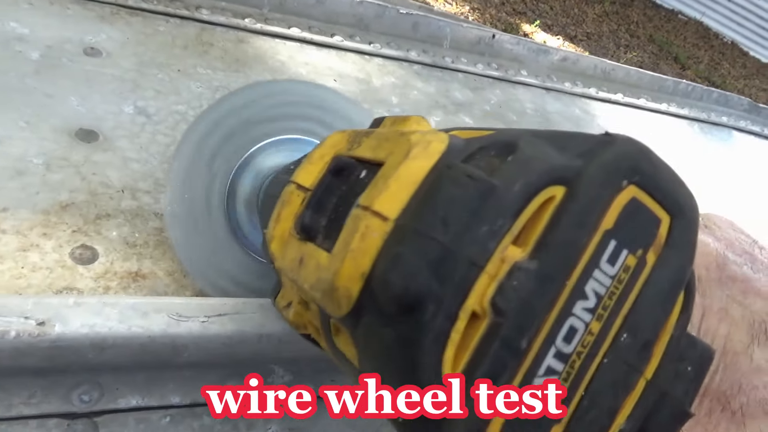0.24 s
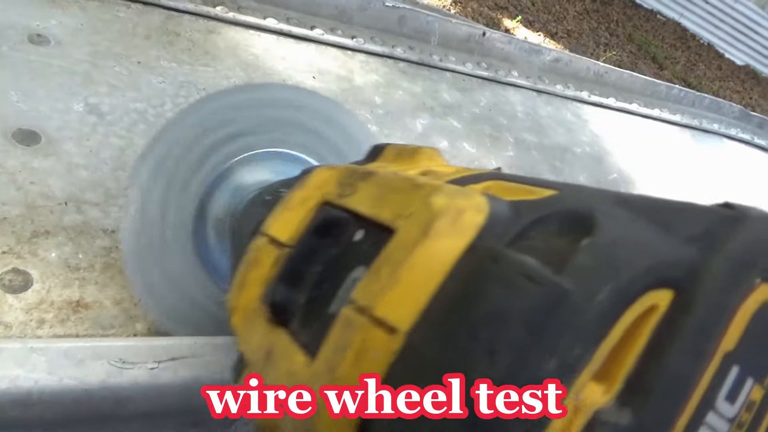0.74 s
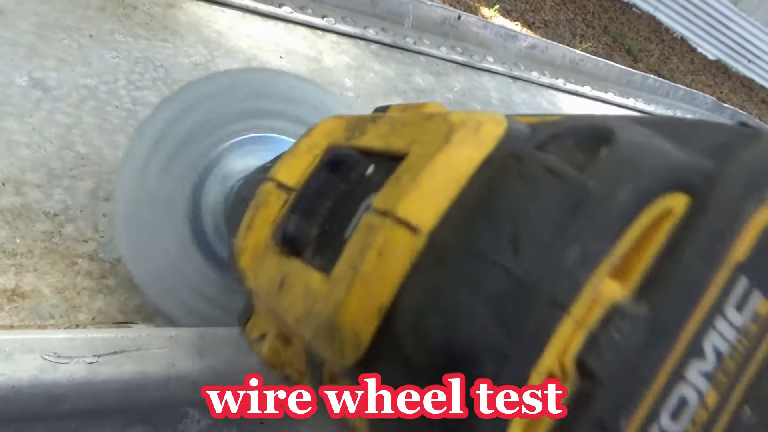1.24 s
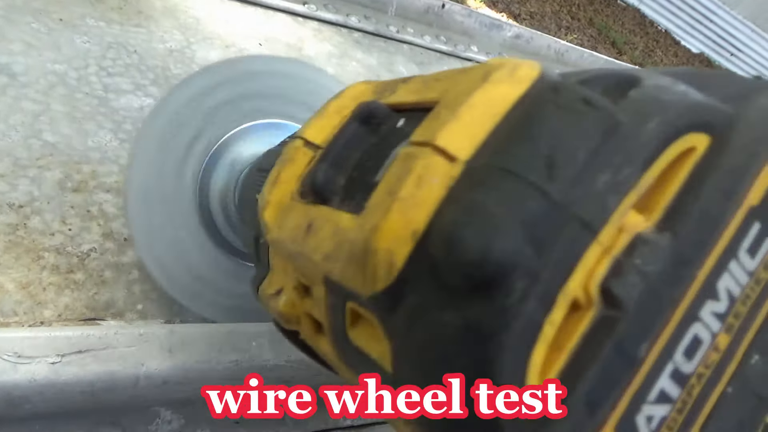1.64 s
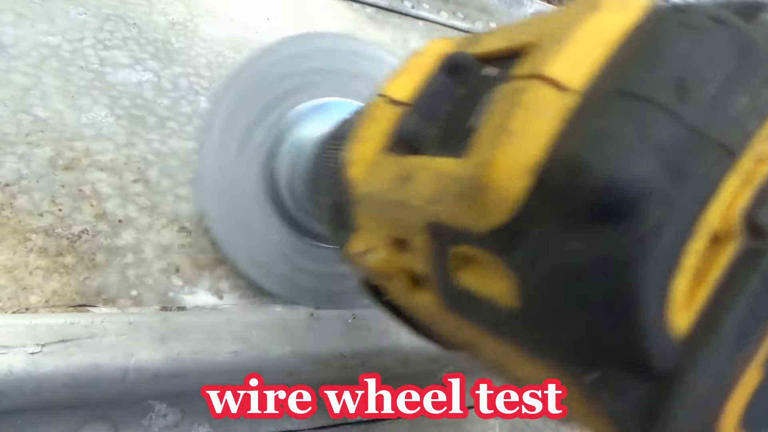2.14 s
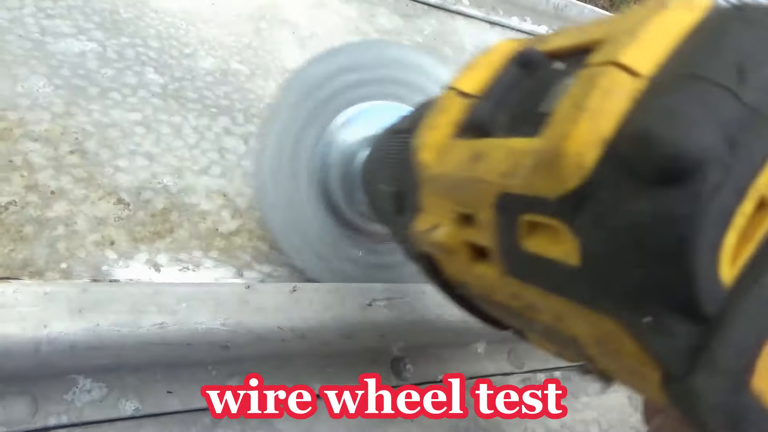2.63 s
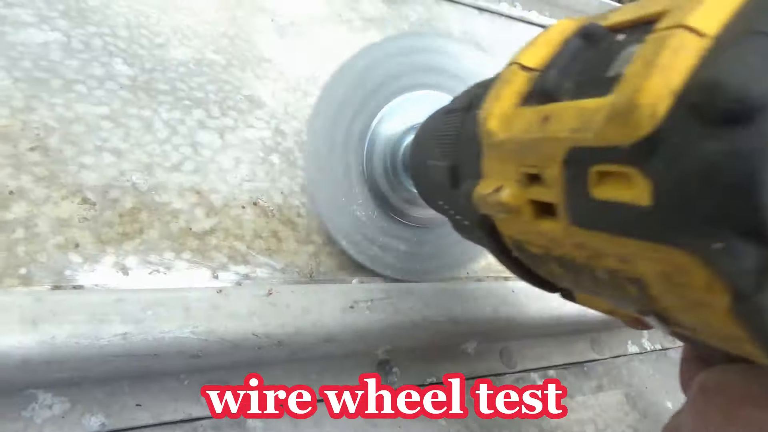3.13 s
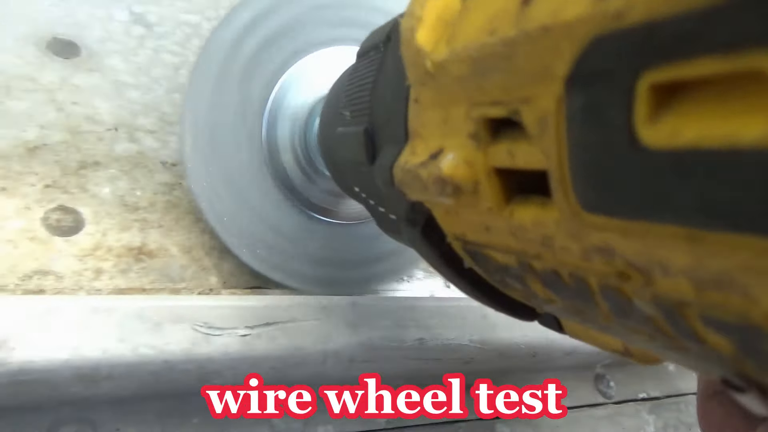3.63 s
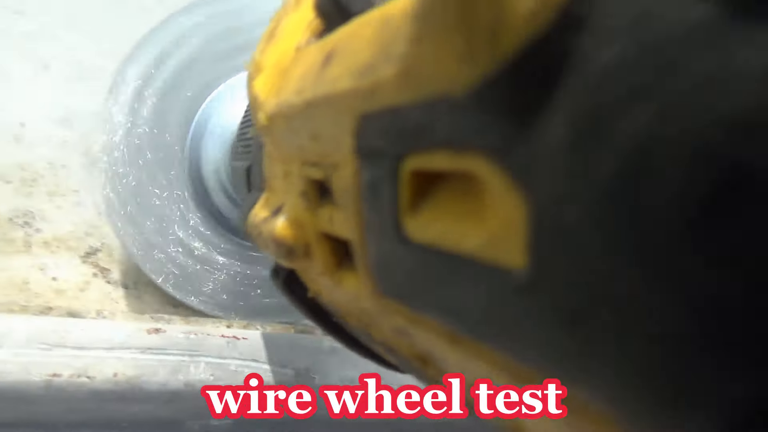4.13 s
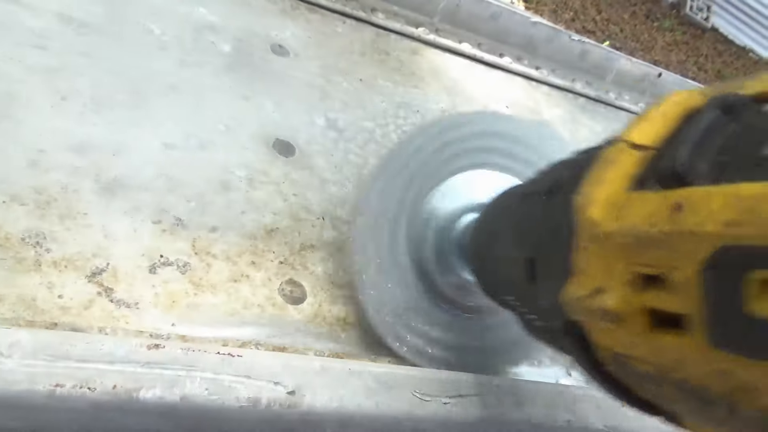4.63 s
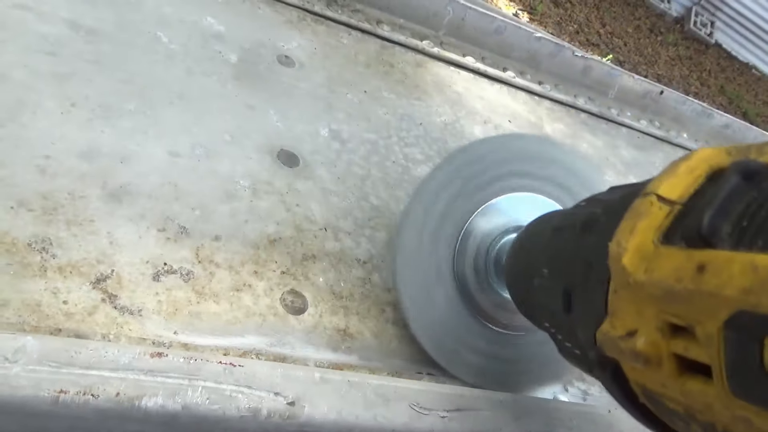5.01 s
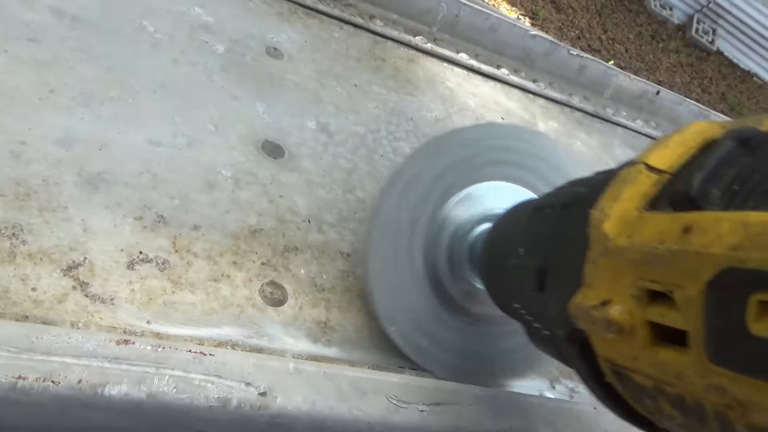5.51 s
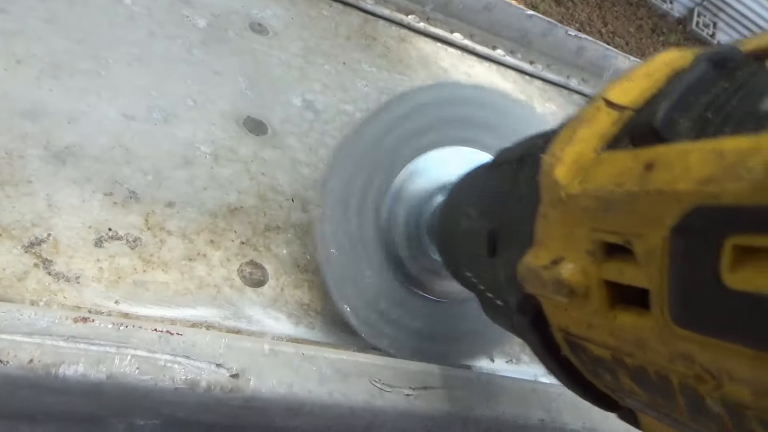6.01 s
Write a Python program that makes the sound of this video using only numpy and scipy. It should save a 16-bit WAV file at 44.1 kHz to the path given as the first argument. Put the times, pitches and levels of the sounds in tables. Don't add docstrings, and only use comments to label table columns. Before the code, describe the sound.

Close and dry outdoors, a cordless drill runs nonstop, its motor and gears singing several steady tones. A wire wheel scours thin metal with a dense, bright hiss. Each back-and-forth stroke, about two a second, makes the whine dip and recover. Brief rasps come where wires catch a rib, and the hull drums softly with a few dull bumps midway and near the end.

```python
import sys
import numpy as np
from scipy import signal
from scipy.fft import rfft, irfft, next_fast_len
from scipy.io import wavfile
from scipy.ndimage import uniform_filter1d

SR = 44100
rng = np.random.default_rng(int(sys.argv[2]) if len(sys.argv) > 2 else 0)


def boost(x):
    u = np.asarray(x, float) / 20
    return 10 ** u


def pcm_store(signal):
    levels = np.round(np.clip(np.atleast_2d(signal), -1, 1) * 32767)
    wavfile.write(sys.argv[1], SR, levels.astype(np.int16).T)


N = 276013

CHUCK_ORDER, CARRIER_ORDER = .065, .265

ROTOR_ORDERS = (1, 2, 16, 19)
POLE_ORDERS = (8, 9)
MESH_ORDERS = (12.71, 13.71, 11.71, 38.13)
HIGH_ORDERS = (26.42, 25.42, 27.42)
RATTLE_ORDERS = (8.1, 13.1, 25.4)
# (level over its control [dB], left over right [dB], left lead [rad],
# roughness [0-1])
ROTOR_LINES = [(0, -1.5, .2, .12), (0, -4.8, .1, .25), (-5.5, -3, .5, .6), (.5, -.8, .5, .3)]
POLE_LINES = [(4, -3.5, 0.65, 0.15), (-4.5, -3, .6, 0.33)]
MESH_LINES = [(0, -2.2, .45, .58), (0, -2.5, .5, .65), (-12, -2.5, .6, .7), (-31, -.2, 0.05, .6)]
HIGH_LINES = [(.5, -1.7, .4, .4), (-12, -1.2, .3, .5), (-16, -1.1, .3, .5)]
RATTLE_LINES = [(-9, -2.8, .9, 1), (-3, -2.5, .5, 1), (-6, -1.2, .3, 1)]
# (mean level [dB], share of vents swing, of gear case swing, of edge bite, press gain [dB])
ROTOR_LEVELS = [(-44, 0.076, 0.14, -0.37, 0.2), (-45.5, -0.077, 0.26, .05, -1.5), (-35, 0.84, -.1, -.8, 3),
                (-41, 0.6, -.1, .1, 5.5)]
# (time [s], motor vents level [dB], gear case level [dB], nose squeal level [dB])
DRILL_POSE = [(0, -29, -35, -55), (.35, -28.5, -38, -61), (.7, -29, -42, -62), (1.2, -29.5, -41, -64),
              (1.45, -31.5, -35, -46), (2.1, -34.5, -31, -40), (2.4, -39, -33, -35.5),
              (3.05, -34.5, -29.5, -33.5), (3.25, -44, -31, -38), (3.6, -39, -29, -42),
              (4.2, -35.5, -27, -38), (4.38, -33, -29.5, -33), (4.52, -48, -37, -41),
              (4.8, -37.5, -32.5, -33), (5.1, -39, -31, -35.5), (5.5, -43, -32, -32.5),
              (5.7, -39.5, -29.5, -32.5), (6.26, -39, -35, -33)]
# (time [s], level [dB])
UPPER_MESH = [
    (0, -49),
    (1, -50),
    (2, -46),
    (3, -57),
    (3.8, -48),
    (4.4, -32),
    (4.6, -62),
    (5.3, -50),
    (5.8, -44),
    (6.26, -26.5),
]
PRESS_GAINS_DB = 1.5, 3.0, 9.0


def drill(turns, pressure):
    lean = pressure - pressure.mean()
    pole_db, mesh_db, squeal_db = [level_db + gain_db * lean + 0.7 * drift(8.0)
                                   for level_db, gain_db in zip(in_time(DRILL_POSE), PRESS_GAINS_DB)]
    vents, case, _ = pose_swings()
    bite = in_time(WHEEL_CONTACT)[1]
    rotor_db = [mean_db + a * vents + b * case + c * bite + press_db * lean
                for mean_db, a, b, c, press_db in ROTOR_LEVELS]
    chuck = 1 + .3 * np.cos(2 * np.pi * CHUCK_ORDER * turns + 1.5 * drift(3))
    carrier = 1 + .5 * np.cos(2 * np.pi * CARRIER_ORDER * turns)
    meshes_db = [mesh_db, in_time(UPPER_MESH)[0], mesh_db, mesh_db]
    highs_db = [squeal_db, mesh_db, squeal_db]

    out = tones(turns, ROTOR_ORDERS, ROTOR_LINES, rotor_db, rough_hz=34.0)
    out += tones(turns, POLE_ORDERS, POLE_LINES, [pole_db] * 2, rough_hz=40.0)
    out += tones(turns, MESH_ORDERS, MESH_LINES, meshes_db, throb=chuck, rough_hz=60.0)
    out += tones(turns, RATTLE_ORDERS, RATTLE_LINES, [pole_db, mesh_db, squeal_db], rough_hz=250.0)
    out += tones(turns, HIGH_ORDERS, HIGH_LINES, highs_db, throb=carrier, rough_hz=50.0)
    return out


def tones(turns, orders, lines, levels_db, throb=1, rough_hz=40):
    out = np.zeros((2, N))
    for order, (db, pan_db, lead, rough), level_db in zip(orders, lines, levels_db):
        rough = np.clip(rough, 0, 1)
        wobble = (drift(rough_hz) + 1j * drift(rough_hz)) / np.sqrt(2)
        shake = np.sqrt(1 - rough ** 2) + rough * wobble
        height = np.sqrt(2) * boost(level_db + db) * throb
        tone = height * shake * np.exp(2j * np.pi * order * turns)
        out[0] += (tone * boost(pan_db / 2) * np.exp(.5j * lead)).real
        out[1] += (tone * boost(-pan_db / 2) * np.exp(-.5j * lead)).real
    return out


def pose_swings():
    return [level_db - level_db.mean() for level_db in in_time(DRILL_POSE)]


# (eased at [s], free speed [turns/s], leaning from [s], leaning until [s], loaded speed [turns/s])
STROKES = [(-.2, 374, -.1, 0, 367.6), (.17, 374.5, .3, .46, 367.5), (.57, 373.5, .73, .92, 364.5),
           (1.07, 375, 1.19, 1.34, 364), (1.5, 376, 1.7, 1.73, 358), (1.92, 374.5, 2.11, 2.19, 359.5),
           (2.37, 368.5, 2.54, 2.65, 355), (2.83, 363, 2.99, 3.05, 353), (3.2, 366.5, 3.41, 3.6, 356),
           (3.87, 362, 4.1, 4.42, 359), (4.63, 362.5, 4.73, 4.89, 350.5), (5.05, 361, 5.22, 5.37, 348.7),
           (5.49, 360, 5.7, 5.82, 345), (5.94, 356, 6.14, 6.24, 344.5)]


def hand():
    eased_s, free, from_s, until_s, loaded = np.transpose(STROKES)
    corner_s = np.ravel([eased_s, from_s, until_s], "F")
    corner_speed = np.ravel([free, loaded, loaded], "F")
    speed = in_time(np.transpose([corner_s, corner_speed]))[0]
    speed = uniform_filter1d(speed, int(.04 * SR), mode="nearest")
    free_speed = in_time(np.transpose([eased_s, free]))[0]
    return speed, (free_speed - speed) / 12


# (time [s], contact level [dB], edge bite level [dB])
WHEEL_CONTACT = [(0, 0.35, -0.8), (.6, 0.93, -0.5), (.9, 0.12, -1), (1.4, 0.28, 1.2), (2.0, 0.21, 1.2),
                 (2.5, 0.23, 0), (3.1, 0.26, 1), (3.4, 0.39, -0.5), (4.3, -0.23, -5.5), (4.5, -0.3, 2.5),
                 (5.0, -1.2, 2), (5.4, -0.46, 1.5), (5.8, -0.58, 1.5), (6.26, 0.075, -.5)]
# (time [s], level [dB])
GRABS = [
    (.25, 2),
    (.82, 0.5),
    (1.13, 3),
    (1.75, 1.5),
    (2.55, 2.5),
    (3.03, 2),
    (4.27, 2),
]
GRAB_SHARES = [0.14, 1.02, .4, .3, .3]
ZONES_HZ = [1900, 3280, 4640, 8600, 12000]
# (share of vents swing, of gear case swing, of contact, of edge bite,
# press gain [dB])
BRUSH_FOLLOWS = [(0.0042, 0.063, 0.82, 0.11, -1), (0.14, 0.02, 1.3, 0.068, 1), (0.1, .05, 1.1, -0.26, 1.1),
                 (-0.011, -0.051, 0.5, 1, -1.6), (.1, -0.026, .6, 0.052, -0.5)]
# (frequency [Hz], likeness squared)
LIKENESS = [(60, 1), (99, 0.98), (160, 0.96), (270, 1), (450, 0.76), (740, 0.4), (1220, 0.62), (2010, 1),
            (3330, 0.57), (5500, 0.42), (9080, 0.85), (15000, 0.89)]
# (frequency [Hz], left over right [dB])
LEAN = [(60, 1), (150, 0.0), (380, -1.0), (950, -3.5), (2380, -3.5), (5980, -2.0), (15000, 0)]
# (frequency [Hz], left lead [rad])
LEAD = [(0, 0), (690, 0.14), (1380, 0.84), (2070, 0.38), (2840, 1), (6460, 0), (7410, 0.62), (10200, 0.0),
        (15300, -0.0)]


def wheel(turns, pressure, level_db, patchy_db, flutter_db):
    size = next_fast_len(N)
    hz = np.arange(size // 2 + 1) * SR / size
    near, left, right = rfft(wire_tips(turns, per_s=25000.0, spread_db=1.5), size)
    alike = np.sqrt(np.clip(at_hz(LIKENESS, hz), 0, 1))
    direct, scattered = np.sqrt(alike) * near, np.sqrt(1 - alike)
    side = boost(at_hz(LEAN, hz) / 2) * np.exp(.5j * at_hz(LEAD, hz))
    both = np.array([(direct + scattered * left) * side, (direct + scattered * right) / side]) * plate(hz)

    controls = [*pose_swings()[:2], *in_time(WHEEL_CONTACT), pressure - pressure.mean()]
    tilt_db = np.array(BRUSH_FOLLOWS) @ controls
    t = np.arange(N) / SR
    grab_db = sum(db * np.exp(-((t - s) / .06) ** 2) for s, db in GRABS)
    zones_db = [zone_db + share * grab_db for zone_db, share in zip(tilt_db, GRAB_SHARES)]
    flutter = flutter_db * (drift(4.8) + drift(40))
    shake_db = in_time(SHAKE)[0]
    lumps = 4.5 * drift(4.5) + 0.2 * (shake_db - shake_db.mean())

    place, out = 2 * np.log2((hz + 1) / 145), 0
    for k in range(15):
        share = np.clip(1 - abs(np.clip(place, 0, 14) - k), 0, 1)
        zone = np.interp(np.log(145 * 2 ** (k / 2)), np.log(ZONES_HZ), range(5))
        low = min(int(zone), 3)
        band_db = zones_db[low] + (zone - low) * (zones_db[low + 1] - zones_db[low])
        band_db = band_db + patchy_db * drift(17.4)
        band_db += flutter * (k / 14) ** 3 + lumps * max(1 - k / 2, 0)
        out = out + boost(band_db) * irfft(both * share, size)[:, :N]
    return boost(level_db) * out / out.std()


def wire_tips(turns, per_s, spread_db):
    hit = rng.random((3, N)) < per_s / SR
    size_db = spread_db * np.minimum(rng.exponential(1, (3, N)), 4)
    sizes = boost(size_db) * rng.choice([-1, 1], (3, N))
    swell_db = .12 * np.cos(2 * np.pi * CHUCK_ORDER * turns) + .3 * drift(7) + .3 * drift(40)
    return hit * sizes * boost(swell_db)


# (frequency [Hz], level [dB])
PLATE_SLOPE = [(30, -43.5), (130, -39.5), (310, -25), (520, -19.5), (700, -15), (1300, -10), (2450, -9),
               (3950, -11), (6000, -10.5), (7200, -14), (9400, -13), (10200, -19), (13500, -25.5),
               (15600, -32.5)]
# (frequency [Hz], width [Hz], level over the slope [dB])
PLATE_MODES = [(1840, 317, 6), (3170, 830, 2.5), (4750, 880, -1), (8060, 1050, 0)]


def plate(hz):
    peaks = sum(boost(db) / np.sqrt(1 + (2 * (hz - centre_hz) / width) ** 4)
                for centre_hz, width, db in PLATE_MODES)
    return boost(at_hz(PLATE_SLOPE, hz)) * (1 + peaks)


# (time [s], peak level [dB])
KNOCKS = [
    (2.362, -48),
    (2.848, -44),
    (3.126, -56),
    (3.299, -74),
    (5.713, -41),
]
# (frequency [Hz], level [dB], time to fade by 60 dB [s])
HULL_MODES = [(155, -11, .16), (205, -7, .07), (255, 0, .1), (305, -2, .07)]
# (time [s], level [dB])
SHAKE = [
    (0, -61),
    (2.2, -51),
    (2.45, -54),
    (2.9, -51),
    (4.28, -55),
    (4.36, -68),
    (5.5, -66),
    (5.8, -55),
    (6.26, -67),
]
# (from [s], until [s], level [dB])
DRUM_BOUTS = [
    (2.053, 2.427, -61),
    (3.042, 3.36, -62.5),
]
BUMP_S = 0.032


def hull(turns):
    t = np.arange(N) / SR
    bouts = sum(boost(db) * np.clip(np.minimum(t - start, end - t) / 0.14 + 1, 0, 1) ** 2
                for start, end, db in DRUM_BOUTS)
    beat_height = np.sqrt(2) * (bouts + boost(-71.5)) * boost(3.3 * drift(19))
    beat = beat_height * np.sin(2 * np.pi * .595 * turns)

    shudder = sum(boost(db - 3.0) * (t > s) * np.exp(-abs(t - s) / .07) for s, db in KNOCKS)
    shake = boost(in_time(SHAKE)[0]) + shudder
    shaking = shake * boost(-32.5 + 2.4 * drift(10)) * rng.standard_normal(N)
    shaking = shaking + 0.079 * np.roll(shaking, 3001) * [[1], [-1]]

    at = [round(s * SR) for s, db in KNOCKS]
    peaks_db = np.array(KNOCKS)[:, 1]
    luck, out = rng.normal(0, 1.4, (len(KNOCKS), len(HULL_MODES))), 0
    for (hz, db, t60), luck_db in zip(HULL_MODES, luck.T):
        push = shaking * boost(db)
        push[:, at] += boost(peaks_db + db + 4 + luck_db)
        soft_push = ring(push, hz, BUMP_S) * 2 * np.log(1000) / (BUMP_S * SR)
        out = out + ring(soft_push, hz, t60)
    low_band = signal.butter(2, [120, 380], "band", fs=SR, output="sos")
    return beat + signal.sosfilt(low_band, out)


def ring(x, hz, t60):
    r, w = boost(-60 / (t60 * SR)), 2 * np.pi * hz / SR
    return signal.lfilter([0, np.sin(w)], [1, -2 * r * np.cos(w), r * r], x)


def in_time(rows):
    s, *columns = np.transpose(rows)
    return [np.interp(np.arange(N) / SR, s, c) for c in columns]


def at_hz(points, hz):
    known, value = np.transpose(points)
    return np.interp(np.log(hz + 1), np.log(known + 1), value)


def drift(rate):
    r = np.exp(-32 * np.pi * rate / SR)
    noise = rng.standard_normal(N // 16 + 4002)
    slow = signal.lfilter([1], [1, -2 * r, r * r], noise)[4000:]
    return np.interp(np.arange(N) / 16, np.arange(len(slow)), slow / slow.std())


def scene():
    speed, pressure = hand()
    tremble = 1 + .002 * drift(28) + .0015 * drift(9)
    turns = np.cumsum(speed * tremble) / SR
    whine = drill(turns, pressure)
    scratching = wheel(turns, pressure, level_db=-18.5, patchy_db=1.06, flutter_db=0.7)
    return whine + scratching + hull(turns)


def top_cut(x):
    return signal.sosfilt(signal.butter(12, 15800, fs=SR, output="sos"), x)


def record(dry):
    return top_cut(dry)


dry = scene()
out = record(dry)
pcm_store(out)
```